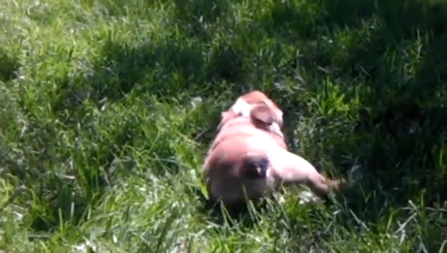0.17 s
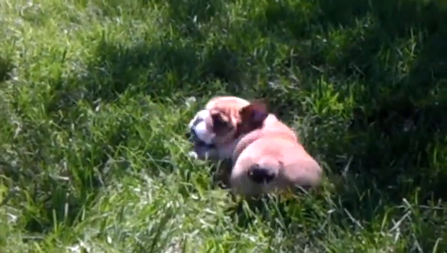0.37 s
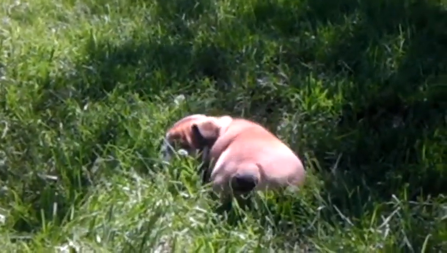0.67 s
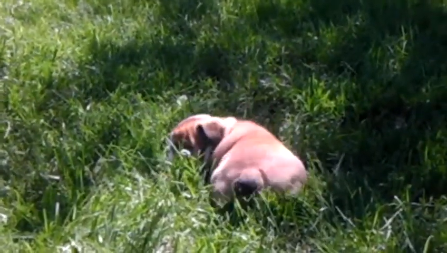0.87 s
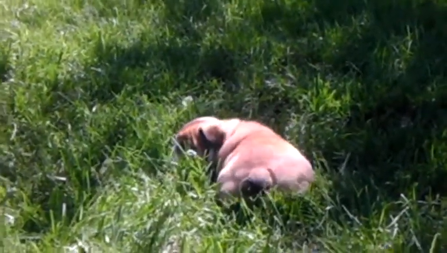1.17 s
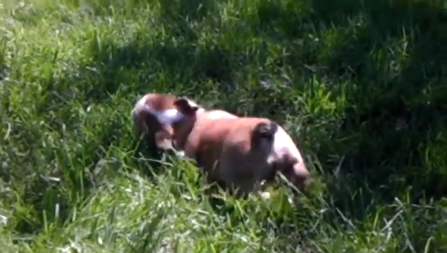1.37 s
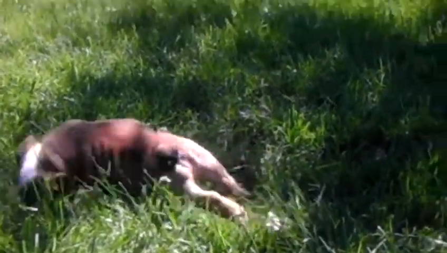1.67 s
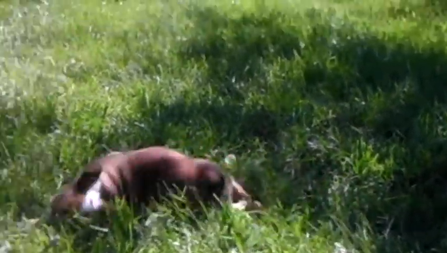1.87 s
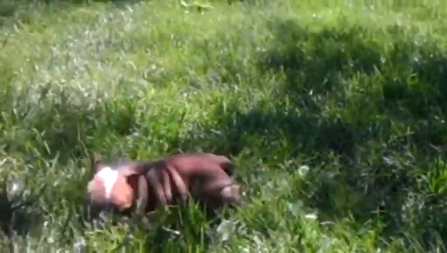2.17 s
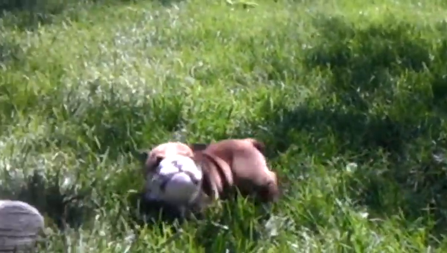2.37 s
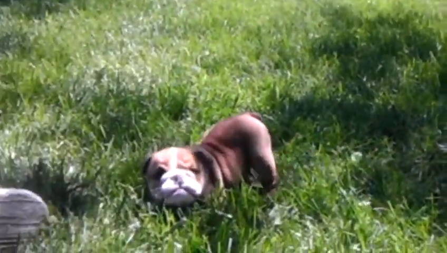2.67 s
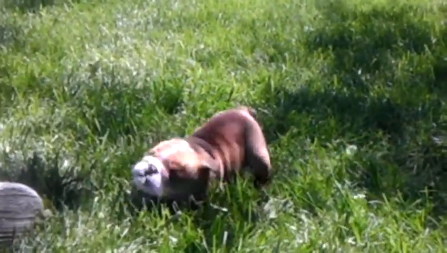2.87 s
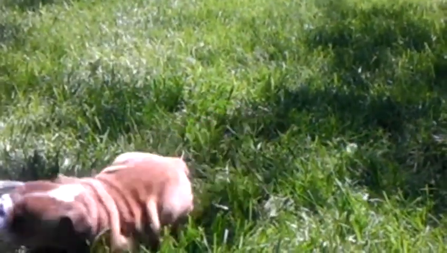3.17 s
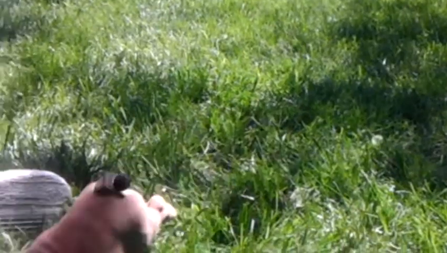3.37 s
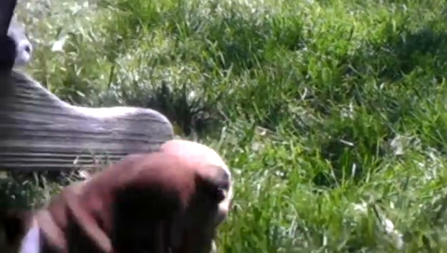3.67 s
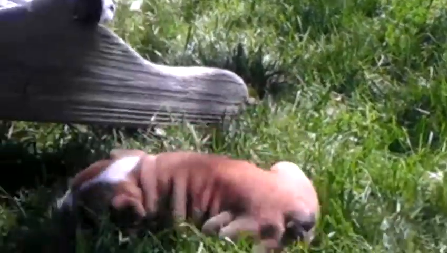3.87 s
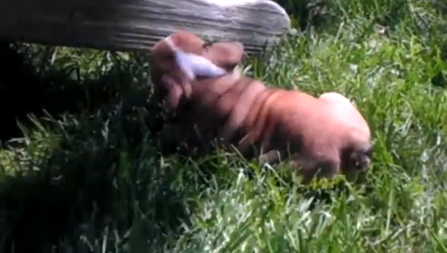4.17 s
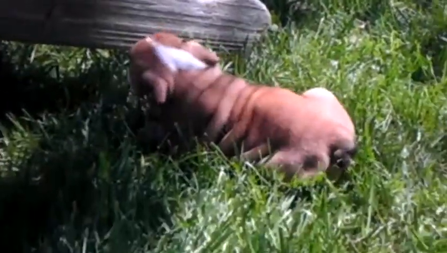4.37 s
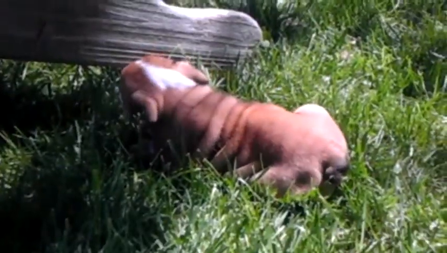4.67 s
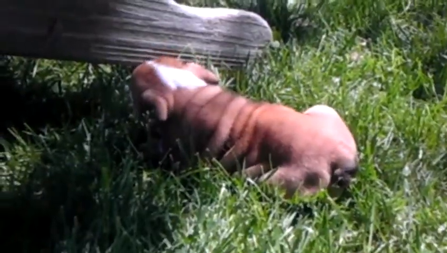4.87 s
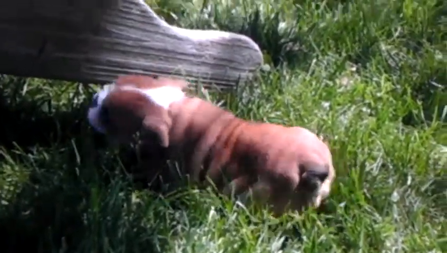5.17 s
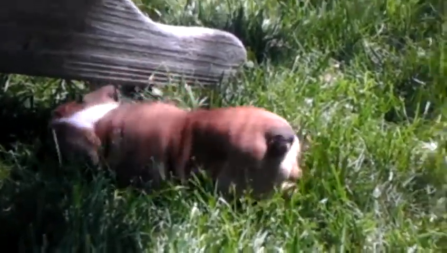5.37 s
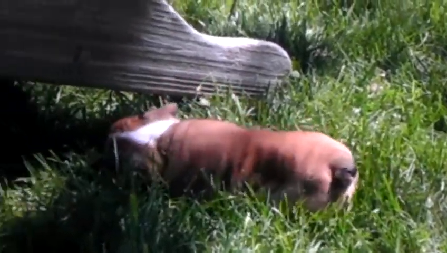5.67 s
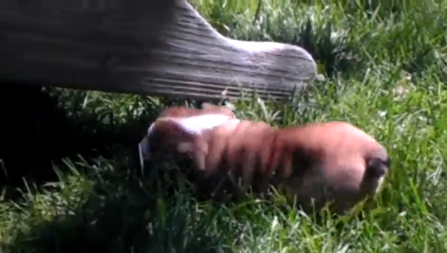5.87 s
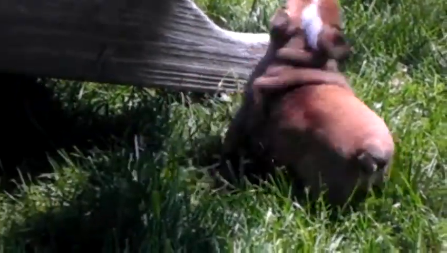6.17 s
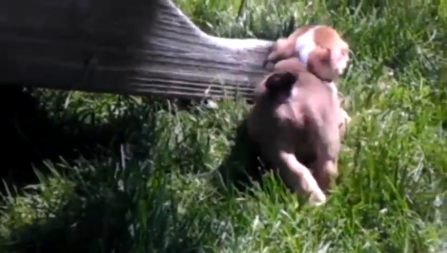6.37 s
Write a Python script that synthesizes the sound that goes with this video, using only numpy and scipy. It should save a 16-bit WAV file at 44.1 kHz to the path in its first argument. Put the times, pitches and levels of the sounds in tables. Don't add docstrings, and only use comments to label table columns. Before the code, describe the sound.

Close outdoors, a puppy shuffles softly through grass, then lets out a single very short, loud yap that rises and cracks into a whistle, with a faint slap of echo from a wall. Grass keeps rustling and ticking. A quiet, low, fluttering growl follows, then a sharp jaw pop and finally a tiny nasal snort. Distant traffic hum, air hiss and slight wind bumps lie beneath, in small-camera stereo.

```python
import sys
import numpy as np
from scipy import signal
from scipy.fft import rfft, irfft, next_fast_len
from scipy.io import wavfile
from scipy.ndimage import uniform_filter1d, map_coordinates

SR = 44100
rng = np.random.default_rng(int(sys.argv[2]) if len(sys.argv) > 2 else 0)


def file_out(sig):
    cols = np.atleast_2d(sig).T
    lim = np.clip(cols, -1, 1)
    pcm = np.round(lim * 32767).astype(np.int16)
    wavfile.write(sys.argv[1], SR, pcm)


def boost(x):
    u = np.asarray(x, float) / 20
    return 10 ** u


N = 287973
T = np.arange(N) / SR


def unit(x):
    return x / np.sqrt(np.mean(x ** 2) + 1e-20)


def along(points, hz):
    f, v = np.transpose(points)
    return np.interp(np.log(hz + 1), np.log(f + 1), v)


def curves(rows, t=T):
    s, *cols = np.transpose(rows)
    return [np.interp(t, s, c) for c in cols]


def wobble(rate_hz):
    return map_coordinates(rng.standard_normal(int(N * rate_hz / SR) + 4), [T * rate_hz])


def held(t, start_s, end_s, db, rise_db_per_s, fall_db_per_s):
    return db - rise_db_per_s * np.clip(start_s - t, 0, None) - fall_db_per_s * np.clip(t - end_s, 0, None)


def loudest(t, rows):
    return np.max([held(t, *row) for row in rows], axis=0)


def stirs(rows):
    power = sum(boost(db) ** 2 * np.exp(-2 * np.abs(T - s) / max(fade_s, .005)) for s, db, fade_s in rows)
    return np.sqrt(power)


def filtered(x, response):
    m = next_fast_len(N + SR // 2)
    return irfft(rfft(x, m) * response(np.fft.rfftfreq(m, 1 / SR)), m)[..., :N]


def peak(f, hz, width_hz):
    return 1j * f * width_hz / (hz * hz - f * f + 1j * f * width_hz + 1e-9)


def resonances(modes):
    return lambda f: sum((-1) ** k * boost(db) * peak(f, hz, w) for k, (hz, w, db) in enumerate(modes))


def rush(spectrum, alike, patchy_db):
    z = signal.stft(rng.standard_normal((2, N)), nperseg=512)[2]
    field = uniform_filter1d(rng.standard_normal(z.shape[1:]), size=6, axis=0)
    field = uniform_filter1d(field, size=10, axis=1)
    pair = signal.istft(z * boost(patchy_db * unit(field)), nperseg=512)[1][:, :N]

    def spread(hz):
        turn = np.arccos(np.clip(along(alike, hz), -1, 1)) / 2
        return boost(along(spectrum, hz)) * [np.cos(turn), np.sin(turn)]

    mid, side = filtered(pair, spread)
    return unit(np.array([mid + side, mid - side]))


def tract(f, mouth_hz, bright_db):
    # (frequency [Hz], width [Hz], level [dB])
    upper = [(2100, 600, -22), (2820, 340, -15), (3400, 400, -33), (4320, 440, -13), (5100, 400, -38),
             (6050, 550, -29), (7500, 700, -43)]
    # (frequency [Hz], width [Hz], level [dB])
    lower = [(390, 65, -14.5), (760, 170, -15)]
    humps = lambda modes: sum(boost(db) * np.abs(peak(f, hz, w)) ** 2 for hz, w, db in modes)
    mouth = np.abs(peak(f, mouth_hz, width_hz=380)) ** 2
    gain = mouth + humps(lower) + boost(bright_db) * humps(upper)
    return gain / (1 + (f / 8200) ** 16) / (1 + (300 / (f + 1)) ** 4)


def yap():
    # (time [s], fold pitch [Hz], mouth resonance [Hz])
    tuning = [(1.353, 365, 1800), (1.364, 395, 1760), (1.376, 415, 1490), (1.386, 450, 1370),
              (1.407, 537, 1255), (1.441, 562, 1280), (1.455, 525, 1240), (1.466, 375, 780),
              (1.49, 270, 500)]
    # (time [s], level [dB])
    effort = [(1.353, -50), (1.359, -20), (1.37, -10), (1.394, -6.5), (1.401, -11), (1.454, -18),
              (1.462, -36), (1.473, -33), (1.49, -52)]
    # (time [s], swell [dB], width [s])
    throbs = [
        (1.3655, -5, .0012),
        (1.4305, 9, .0013),
        (1.436, 2.5, .002),
        (1.4405, -10, .0015),
        (1.446, 6, .002),
        (1.4505, 1, .001),
    ]
    # (start [s], end [s], level [dB], rise [dB/s], fall [dB/s])
    breaths = [
        (1.36, 1.41, -30.5, 4000, 1300),
        (1.414, 1.449, -26, 500, 1400),
    ]
    # (start [s], end [s], level [dB], rise [dB/s], fall [dB/s])
    whistles = [
        (1.359, 1.371, -9.5, 4200, 1500),
        (1.428, 1.449, -12, 1700, 2700),
    ]
    # (multiple, level [dB])
    overtones = [(2, -16), (3, -17), (5, -32)]
    crack_s, shut_db = 1.41, -20

    on = slice(int(tuning[0][0] * SR), int(tuning[-1][0] * SR))
    t = T[on]
    cracked = t > crack_s
    pitch_hz, mouth_hz = curves(tuning, t)
    folds_db = curves(effort, t)[0]
    breath_db, whistle_db = loudest(t, breaths), loudest(t, whistles)
    bright_db = lambda s: np.maximum(held(s, 1.372, 1.449, 1, 1100, 1300), shut_db)
    swell_db = sum(db * np.exp(-.5 * ((t - s) / w) ** 2) for s, db, w in throbs)

    cycles = np.cumsum(pitch_hz * (1 + .006 * wobble(300)[on])) / SR
    k = np.arange(1, 21)[:, None]
    flicker = np.array([uniform_filter1d(rng.standard_normal((2, len(t))), size=90) * 9.5 for _ in k])
    rough = np.clip(k / 12 + .5 * (k == 1) * (t > 1.39), .15, 1) * (.55 + .8 * cracked)
    size = tract(k * pitch_hz, mouth_hz, bright_db(t)) * boost(6 * rough * flicker[:, 0])
    phase = 2 * np.pi * k * cycles + k * k + .7 * rough * flicker[:, 1]
    folds = (size * np.sin(phase)).sum(0)

    puffs = rng.standard_normal(len(t)) * (1 + .6 * np.cos(2 * np.pi * cycles))
    hz, frames, z = signal.stft(puffs, SR, nperseg=256)
    frames_s = frames + t[0]
    z = z * tract(hz[:, None], curves(tuning, frames_s)[1], bright_db(frames_s))
    breath = signal.istft(z, SR, nperseg=256)[1][:len(t)]

    turns = 2 * np.pi * np.cumsum(mouth_hz * (1 + .008 * wobble(150)[on])) / SR
    upper = sum(boost(db + 2.5 * wobble(200)[on]) * np.sin(.97 * n * turns) for n, db in overtones)
    whistle = boost(swell_db) * np.sin(turns) + cracked * upper

    voice = np.zeros(N)
    voice[on] = boost(folds_db) * folds + boost(breath_db + swell_db / 3) * unit(breath) + boost(whistle_db) * whistle
    return filtered(voice, lambda hz: 1 / (1 + (250 / (hz + 1)) ** 4))


def growl():
    # (start [s], end [s], level [dB], rise [dB/s], fall [dB/s])
    stretches = [
        (3.46, 4.5, -49, 140, 20),
        (3.735, 4.04, -46, 40, 6),
    ]
    # (time [s], rate [1/s])
    flaps = [(3.4, 30), (3.7, 28.6), (3.89, 28.2), (3.95, 26.7), (4.4, 26.3), (4.7, 22)]
    # (frequency [Hz], width [Hz], level [dB])
    cavities = [(260, 150, 0), (450, 220, -6), (770, 170, -4.5), (1040, 200, -11)]
    stop_s, cut_s = 4.7, .04
    mouth_shuts_s, muffle_db_per_s = 4.48, 30

    phase = np.cumsum(curves(flaps)[0]) / SR
    phase = phase - phase[round(3.712 * SR)] + .06 * wobble(14)
    flap = .1 + np.exp(-(phase % 1) / .25) * np.clip(phase % 1 / .1, 0, 1)
    puffs = flap * rng.standard_normal(N) * boost(0.72 * wobble(25))
    chest = unit(filtered(flap * wobble(700), resonances(cavities[:1])))
    throat = unit(filtered(puffs, resonances(cavities[1:])))
    muffle = boost(held(T, 0, mouth_shuts_s, 0, 0, muffle_db_per_s))
    cut = np.clip(1 - (T - stop_s) / cut_s, 0, 1)
    return cut * boost(loudest(T, stretches)) * unit(muffle * throat + 1.15 * chest)


def snort():
    # (start [s], end [s], level [dB], rise [dB/s], fall [dB/s])
    blast = (6.444, 6.452, -39, 1300, 1500)
    # (frequency [Hz], width [Hz], level [dB])
    nose = [(970, 35, 6), (1360, 52, -1.5), (1750, 87, -4.5), (2060, 100, -5), (2834, 120, -8.5),
            (3600, 270, -8.5), (5530, 2500, -21)]
    air = boost(3 * wobble(500)) * rng.standard_normal(N)
    return boost(held(T, *blast)) * unit(filtered(air, resonances(nose)))


def clicks(rows, cycles, glide, rise):
    out, t = np.zeros((2, N + SR)), np.arange(SR // 50) / SR
    for s, db, hz, pan_db in rows:
        turns = hz * t + glide * (1 - np.exp(-t / .0004))
        ring = np.sin(2 * np.pi * turns) * (t * hz) ** rise * np.exp(-t * hz / cycles)
        gain = boost(db + np.array([[pan_db / 2], [-pan_db / 2]]))
        out[:, round(s * SR):][:, :len(t)] += gain * ring / np.abs(ring).max()
    return out[:, :N]


def pops_of_jaw_and_paws():
    # (time [s], peak [dB], frequency [Hz], left-right [dB])
    knocks = [
        (5.27155, -17.5, 930, -7),
        (5.2714, -37, 2300, -7),
        (5.2722, -31, 560, -7),
        (5.2768, -41, 900, 14),
        (6.4585, -36, 260, 0),
        (.518, -38, 800, 0),
    ]
    return clicks(knocks, cycles=.5, glide=.8, rise=2.5)


def grass_ticks():
    # (time [s], peak [dB], frequency [Hz], left-right [dB])
    snaps = [(0.3094, -41, 8920, 1.5), (0.3344, -52, 2230, 2), (0.5184, -46, 3060, -0.5),
             (0.7444, -57, 2620, 0.0), (1.1653, -42, 2790, 3), (1.948, -39, 2990, -0.5),
             (2.6424, -50, 3160, -4), (3.5683, -41.5, 3220, 2), (4.129, -41, 4100, -7),
             (4.4034, -42, 3900, -2), (4.6688, -50, 2540, -1.0), (5.1536, -40, 8300, 4),
             (5.3627, -48, 2470, 0.0), (5.4144, -70, 4040, 7), (5.6667, -49, 2480, 1.5),
             (6.4906, -50, 3670, -2.0)]
    return clicks(snaps, cycles=1.5, glide=0.12, rise=0.51)


def grass():
    # (time [s], level [dB], fade [s], bright over dull [dB])
    brushes = [(0.0, -56.5, 0.034, -3), (.22, -56, .07, -1), (.37, -52.5, 0.12, 0.5), (.54, -55, .03, 4),
               (.75, -60, 0.028, -3), (1.17, -71, 0.02, -7), (1.3, -62, 0.05, -2), (1.64, -57.5, 0.12, -8),
               (1.85, -55.5, 0.16, -0.5), (2.14, -56.5, 0.08, 4.5), (2.278, -52.5, 0.048, 5.5),
               (2.5, -60, .03, 1), (2.65, -65.5, .02, -9), (2.96, -65, 0.013, 1),
               (3.148, -53.5, 0.064, 3.5), (3.3, -63, 0.048, -2.5), (3.45, -54, 0.28, 2),
               (3.91, -56.5, 0.1, -2), (4.098, -49.5, 0.043, 2.5), (4.4, -59, 0.064, 0),
               (4.65, -63, .06, 2), (4.99, -74.5, 0.058, 12), (5.15, -65.5, 0.085, 7),
               (5.38, -61, 0.075, -8), (5.8, -70, .1, 12), (5.98, -64, 0.054, 5), (6.12, -60.5, 0.13, 2),
               (6.43, -56, 0.025, 0), (6.49, -54.5, .02, -1)]
    # (time [s], level [dB], fade [s])
    thumps = [(0.0, -60.5, .04), (.17, -55.5, 0.051), (.44, -49.5, 0.073), (1.28, -57.5, 0.12),
              (1.88, -57.5, .05), (2.3, -60, 0.085), (3.17, -52.5, 0.072), (5.35, -51, .08),
              (5.92, -60.5, .03), (6.4, -53.5, 0.087)]
    fizz_db, scuff_db = -5.5, -0.5
    turf_db = -62.5

    def layer(over_db, lean):
        return stirs([(s, db + over_db + lean * bright_db, fade_s) for s, db, fade_s, bright_db in brushes])

    def scraped(spectrum, alike, patchy_db):
        scrapes = boost(2.3 * wobble(400) + 1.2 * wobble(30))
        return unit(scrapes * rush(spectrum, alike, patchy_db))

    swish = scraped([(2000, -4), (4500, 1.5), (7000, -3), (9500, -7.0), (12000, -33)], [(5000, 0.22)], 2.0)
    fizz = scraped([(6000, -21.5), (9500, 0.5), (13500, 0.5), (15000, -19)], [(9000, 0.23)], -2.5)
    scuff = scraped([(600, -16), (1300, 0.5), (3000, -7.0), (5000, -16.5)], [(2000, 0.24)], -4.5)
    turf = scraped([(150, -26), (350, -0.5), (1000, -2), (1800, -23.5)], [(500, 0.46)], 1.8)
    blades = layer(0, 0) * swish + layer(fizz_db, 1) * fizz + layer(scuff_db, -1) * scuff
    return blades + (boost(turf_db) + stirs(thumps)) * turf


def yard(x):
    # (frequency [Hz], t60 [s])
    decay = [(300, .15), (1200, .19), (2200, .36), (5000, .26), (12000, .1)]
    hz, t, z = signal.stft(rng.standard_normal((2, SR // 2)), SR, nperseg=256)
    tail = signal.istft(z * boost(-60 * t / along(decay, hz)[:, None]), SR, nperseg=256)[1]
    return signal.fftconvolve(np.pad(x, (200, 0))[None], tail / np.linalg.norm(tail[0]), axes=1)[:, :N]


def background():
    # (frequency [Hz], level [dB/Hz])
    hum_spectrum = [(30, -62), (64, -18), (133, -1.5), (243, -4), (303, -9.5), (508, -21), (800, -30.5),
                    (1540, -120)]
    # (frequency [Hz], level [dB/Hz])
    air_spectrum = [(240, -22), (400, -10.5), (942, -4.5), (2990, -11.5), (6500, -24), (13100, -19),
                    (13900, -21), (14500, -43)]
    # (frequency [Hz], left-right likeness)
    alike = [(60, 0.91), (180, 0.98), (540, 0.68), (1620, 0.033), (4840, 0.11), (14500, 0.074)]
    # (time [s], level [dB], fade [s])
    gusts = [(.4, -56, .2), (1.0, -44, 0.19), (1.35, -42, .1), (5.5, -51.5, 0.11), (5.9, -43, 0.17),
             (6.33, -47.5, 0.29)]
    # (frequency [Hz], level [dB])
    tones = [(12543, -87)]
    hum_db, hum_swell = -47, [(5.9, -43.5, 0.33)]
    air_db, wind_db = -54, -8.0

    hum_gain = np.hypot(boost(hum_db), stirs(hum_swell)) * boost(0.36 * wobble(3.326))
    hum = hum_gain * rush(hum_spectrum, alike, patchy_db=0.88)
    air = boost(air_db) * rush(air_spectrum, alike, patchy_db=0.2)
    buffet = rush([(15, -41), (40, -15.5), (80, 12.5), (200, -35.5)], [(50, .3)], patchy_db=2.0)
    wind = boost(wind_db) * stirs(gusts) * buffet
    whine = sum(np.sqrt(2) * boost(db) * np.sin(2 * np.pi * hz * T) for hz, db in tones)
    return hum + air + wind + whine


def scene():
    # (frequency [Hz], left-right [dB])
    pan = [(200, .5), (700, -1.5), (1300, -3), (2300, 3), (4300, 1), (8000, .5)]
    # (frequency [Hz], left lead [rad])
    lead = [(300, 0), (1330, .3), (1620, 1.25), (1900, 1.2), (2240, 2.5), (2670, .8), (3270, .4),
            (8270, 1.5)]
    bark, half = yap(), np.array([[.5], [-.5]])
    direct = filtered(bark, lambda hz: boost(half * along(pan, hz)) * np.exp(1j * half * along(lead, hz)))
    dull = filtered(bark, lambda hz: peak(hz, 1700, 1500))
    wall = boost(-26) * np.array([np.roll(dull, round(delay_s * SR)) for delay_s in (.1035, .1037)])
    pops = pops_of_jaw_and_paws()
    close = growl() + snort()
    far_bark = filtered(bark, lambda hz: peak(hz, 2050, 1500) ** 2)
    space = boost(-30) * yard(bark) + boost(-23) * np.roll(yard(far_bark), round(.09 * SR), axis=1)
    space = space + boost(-16) * yard(pops.mean(0)) + boost(-14) * yard(close)
    return direct + wall + space + pops + close + grass_ticks() + grass() + background()


def low_pass(x):
    return signal.sosfilt(signal.butter(12, 15110, fs=SR, output="sos"), x)


def record(dry):
    rounded = dry / (1 + np.abs(dry / .92) ** 8) ** (1 / 8)
    return low_pass(rounded)


dry = scene()
out = record(dry)
file_out(out)
```